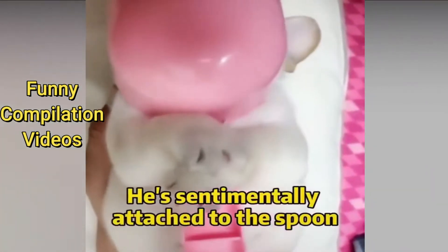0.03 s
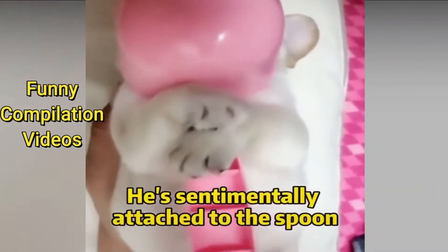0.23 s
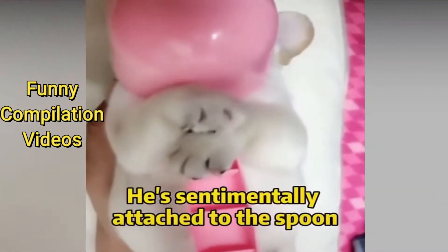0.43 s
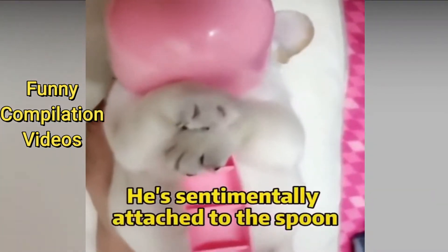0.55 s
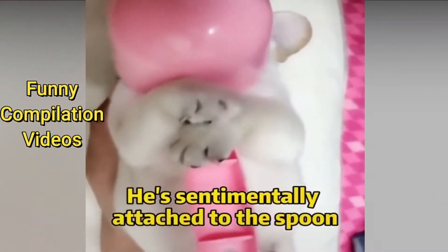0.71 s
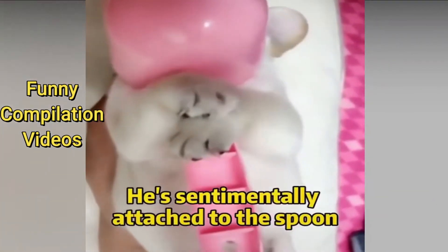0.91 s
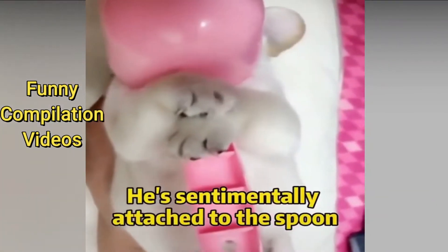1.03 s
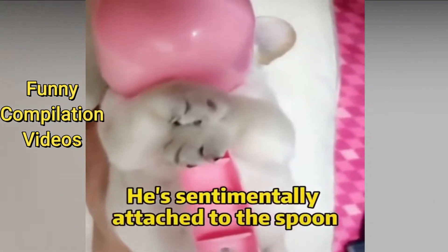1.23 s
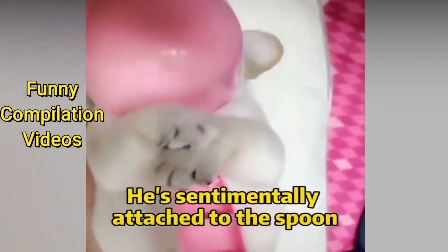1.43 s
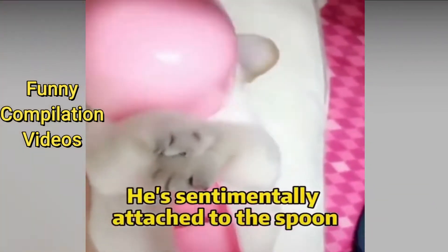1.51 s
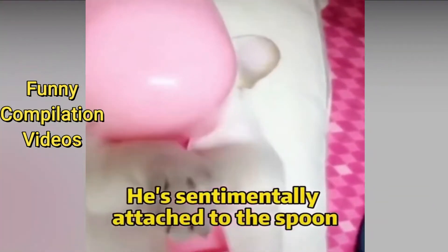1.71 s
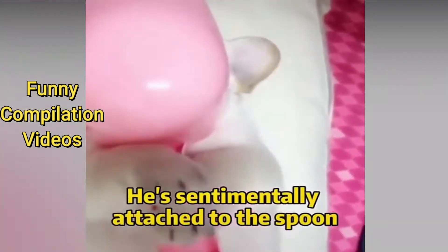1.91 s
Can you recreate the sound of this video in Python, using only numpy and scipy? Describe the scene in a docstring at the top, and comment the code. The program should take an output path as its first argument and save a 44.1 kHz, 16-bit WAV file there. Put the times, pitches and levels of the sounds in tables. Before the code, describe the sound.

A small puppy very close to a phone microphone gives two quick clear yips, then a long, rough, high-set growl, ending in a small puff of breath and a faint squeak over soft room murmur.

```python
"""In a soft, humming room a small puppy close to a phone gives two short clear yips, then a long rough growl.
Source-filter principle: fold closures are impulses, and mouth or throat is a resonant filter.
The yips pulse almost evenly; the growl's folds slap unevenly, and each slap rings the throat with a puff of air.
A puff of breath and a faint squeak follow; a short room tail, a murmur and a wavering low hum lie behind."""
import sys
import numpy as np
from scipy import signal
from scipy.fft import rfft, irfft, next_fast_len
from scipy.io import wavfile
from scipy.ndimage import uniform_filter1d, map_coordinates

SR = 44100
rng = np.random.default_rng(int(sys.argv[2]) if len(sys.argv) > 2 else 0)


def master_out(mix):
    """Clip the mix to full scale and print it as 16-bit PCM to the path in sys.argv[1]."""
    frames = np.transpose(np.atleast_2d(mix))
    ceiling = np.clip(frames, -1, 1)
    pcm = np.round(ceiling * 32767).astype(np.int16)
    wavfile.write(sys.argv[1], SR, pcm)


N = 85995

# Growl strength: (time [s], chest band level [dB], mouth band level over the chest band [dB])
GROWL_LEVELS = [(0.387, -32.5, 0.5), (0.405, -29.5, -2.5), (0.429, -39, -3), (0.459, -30.5, -4),
                (0.523, -31, 0.5), (0.563, -29, -3.5), (0.571, -33, -0.5), (0.625, -35, 3),
                (0.683, -31.5, -0.5), (0.717, -27.5, -1), (0.763, -30, 0), (1.031, -28, 1),
                (1.471, -30.5, -1.5), (1.525, -28.5, -1), (1.629, -33, -2), (1.637, -28.5, 0),
                (1.681, -46.5, -6.5), (1.69, -59, 1)]
# Growl brilliance over the chest band: (time [s], treble level [dB], top hiss level [dB])
GROWL_BRIGHTNESS = [(.38, -25.5, -38), (.43, -14, -35), (.47, -20, -40), (.65, -15, -36.5),
                    (1.2, -15.5, -33), (1.4, -18.5, -31.5), (1.62, -14.5, -32), (1.655, -16.5, -32),
                    (1.69, -24.5, -35)]
# Fold motion in the growl: (time [s], preferred rate [Hz], share of cycles that stumble [0-1])
FOLD_RATE = [(.38, 230, .6), (.46, 295, .45), (.6, 285, .5), (.8, 277, .5), (1.05, 269, .5),
             (1.15, 260, .5), (1.35, 254, .55), (1.5, 250, .7), (1.69, 245, .85)]
# Throat resonances: (frequency [Hz], gain [dB])
THROAT = [(59, -64), (100, -23.5), (219, -7.5), (240, -8), (344, -14), (463, -13), (509, -4), (567, -2.5),
          (633, 2.5), (706, -1.5), (788, 3), (893, -1.5), (1060, 3), (1500, -12), (1750, -16),
          (1920, -13.5), (2210, -1), (2550, -9.5), (2800, -1.5), (2980, -11.5), (3220, -28.5),
          (3590, -23.5), (4200, -38.5), (5460, -86), (9240, -120)]
# Resonances of the growl's treble: (frequency [Hz], gain [dB])
TREBLE = [(2470, -27), (4200, -16), (4580, -4.5), (5050, -14.5), (5250, -2), (5570, 1), (5850, -2),
          (6350, -10), (7390, -3.5), (7630, 3), (7930, -14), (8150, -8.5), (9030, -31), (11700, -24),
          (13400, -31), (14100, -28.5), (15400, -48)]
# Course of each yip: (time [s], pitch [Hz], level [dB], weakening of every other pulse [dB],
# share of the second shape [0-1])
FIRST_YIP = [(.2245, 330, -55, 4, 0), (.227, 329, -24, 0, 0), (.231, 331, -24, 5, 0.02),
             (.238, 404.4, -23.5, 4, 0.02), (.252, 394.5, -22.5, -3, 0.01), (.261, 401, -26, 2, 0.43),
             (.268, 427, -31.5, 9, 0.65), (.277, 459, -31.5, 4, 1), (.283, 440, -70, 6, 0.9)]
SECOND_YIP = [(.337, 424, -52, 0, 0.32), (.34, 435, -26, 6, 0.46), (.345, 447, -25, -2, 0.69),
              (.351, 468, -26, -2, 0), (.374, 468.6, -28, 5, 0), (.381, 522, -37.5, -7, 0.13),
              (.389, 562, -29, 2, 1), (.398, 585, -53, 13, 1)]
# Mouth resonances of the first yip, first and second shape: (frequency [Hz], gain [dB])
FIRST_MOUTH = [(180, -40), (400, -11.5), (600, -10), (790, -2), (1000, 5.5), (1200, -5.5), (1650, -15.5),
               (2050, -12.5), (2600, -25.5), (3200, -41), (5000, -53), (6300, -50), (9000, -56),
               (15000, -80)]
FIRST_MOUTH_END = [(210, -28), (450, 2), (900, -1), (1520, -6), (2100, 6.5), (2860, -18), (3600, -20),
                   (4800, -46), (6300, -15), (7440, -37), (9000, -32), (13000, -42), (16000, -64)]
# Mouth resonances of the second yip in its body; its attack mixes in the throat and its end is
# all throat: (frequency [Hz], gain [dB])
SECOND_MOUTH = [(210, -31), (350, -7), (484, -2), (659, -15), (911, -0.5), (1450, -9.5), (2810, 2),
                (3230, -46), (4010, -26.5), (4750, -22.5), (5550, -25), (6880, -21.5), (10300, -43.5),
                (13000, -37), (14000, -68)]
# Airy puff after the growl: (start [s], rise constant [s], fade constant [s], level before the envelope [dB])
BREATH = (1.686, .01, .035, -57)
# Colour of that puff: (frequency [Hz], gain [dB])
BREATH_TONE = [(1800, -60), (3200, -12), (4700, 0), (5800, -1), (9000, -9), (15400, -15)]
# Faint squeak: (start [s], end [s], mean frequency [Hz], peak level [dB])
SQUEAK = (1.795, 1.832, 2300, -56)
# Colour of the room's murmur: (frequency [Hz], gain [dB])
ROOM_TONE = [(41, -13), (70, -9), (158, -9), (193, -5), (277, -5.5), (398, -0.5), (435, 4), (558, -10),
             (639, -9.5), (917, -9.5), (1440, -15), (6240, -35), (6830, -34), (9150, -36.5), (15400, -46)]
# Mean course of the murmur: (time [s], level [dB])
ROOM_LEVEL = [(0, -49), (.08, -47.5), (.15, -50.5), (.3, -47.5), (1.0, -46.5), (1.72, -43.5), (1.85, -48),
              (1.95, -49)]

# Growl folds: cycle-length jitter and rate drift (fractions), pulse-size scatter and level unevenness [dB]
GROWL_JITTER, GROWL_SCATTER_DB, WANDER, LUMP_DB = .04, 1.6, .012, .6
STUMBLE_CYCLES = .75  # greatest extra length of a stumbling cycle
# Air relative to the slaps, before filtering: chest, mouth and treble bands
AIR_DB, MOUTH_AIR_DB, TREBLE_AIR_DB = -10, -6, 9
AIR_DECAY_S, STEADY_AIR = .002, .4  # puff decay constant; steady flow against bursts of rms 1
AIR_LEAD_S, CHEST_LAG_S = .0016, .0003  # upper-band air leads the slap; the chest band speaks late
SPLIT_HZ, HISS_HZ = 1650, 9000  # chest/mouth boundary; start of the top hiss
YIP_JITTER, YIP_SCATTER_DB, YIP_AIR_DB = .006, .8, -17
ROOM_DB, ROOM_T60_S = -20, .1
HUM_HZ, HUM_DB = 53.2, -59  # centres about which the hum wavers
TOP_HZ = 15500


def growl():
    """Irregular excitation of resonators: slaps and puffs ring the throat, with more air than slap in the treble."""
    level_db, mouth_db, span = curves(GROWL_LEVELS)
    treble_db, hiss_db, _ = curves(GROWL_BRIGHTNESS)
    rate, stumble, _ = curves(FOLD_RATE)
    wandering_rate = rate * (1 + WANDER * wobble(25))
    slaps = unit(pulses(wandering_rate, GROWL_JITTER, GROWL_SCATTER_DB, stumble=stumble))
    late_slaps = np.roll(slaps, round(CHEST_LAG_S * SR))
    parting = np.roll(slaps, -round(AIR_LEAD_S * SR))  # the folds part ahead of the slap
    drive = gated(level_db + LUMP_DB * wobble(44.8), span)

    chest = below(coloured(late_slaps + amp(AIR_DB) * puffs(slaps), THROAT), SPLIT_HZ)
    voiced = coloured(slaps + amp(MOUTH_AIR_DB) * puffs(parting), THROAT)
    mouth = voiced - below(voiced, SPLIT_HZ)
    bright = coloured(slaps + amp(TREBLE_AIR_DB) * puffs(parting), TREBLE)
    treble = below(bright, HISS_HZ)
    hiss = bright - treble

    bands = unit(chest, span) + amp(mouth_db) * unit(mouth, span)
    bands += amp(treble_db) * unit(treble, span) + amp(hiss_db) * unit(hiss, span)
    return drive * bands


def pulses(rate, jitter, scatter_db, alternate_db=0, stumble=0):
    """Perturbed periodic excitation: one impulse a cycle, uneven in length and size; stumbling cycles run long."""
    count = N // 40
    draw, luck = rng.standard_normal((count, 2)), rng.random((count, 2))
    cycles, order = np.cumsum(rate) / SR, np.arange(count)
    # 1.18 approximates the mean cycle length, stumbles included
    chance = np.interp(order * 1.18, cycles, stumble + np.zeros(N))
    extra = (luck[:, 0] < chance) * STUMBLE_CYCLES * luck[:, 1]
    due = np.cumsum(1 + jitter * draw[:, 0] + extra)
    at = np.interp(due, cycles, np.arange(N), right=N + 20)
    weak_db = np.interp(at, np.arange(N), alternate_db + np.zeros(N)) * (order % 2)
    size = amp(scatter_db * draw[:, 1] - weak_db)
    # A windowed sinc places each impulse between samples
    k = np.floor(at).astype(int)[:, None] + np.arange(-7, 9)
    offset = k - at[:, None]
    kernel = np.sinc(offset) * np.cos(np.pi * offset / 16) ** 2
    return np.bincount(k.ravel() + 8, (kernel * size[:, None]).ravel(), N + 64)[8:N + 8]


def puffs(slaps):
    """Turbulence modulated by the folds: noise bursts at each slap and decays, over a steady stream."""
    decay = np.exp(-np.arange(SR // 50) / SR / AIR_DECAY_S)
    bursts = unit(np.abs(signal.fftconvolve(slaps, decay)[:N]))
    return unit((STEADY_AIR + bursts) * rng.standard_normal(N))


def yip(course, shape_a, shape_b):
    """Near-periodic excitation: pulses with a little air pass a filter moving between two resonant shapes."""
    pitch, level_db, alternate_db, second_share, span = curves(course)
    air = amp(YIP_AIR_DB) * rng.standard_normal(N)
    folds = unit(pulses(pitch, YIP_JITTER, YIP_SCATTER_DB, alternate_db)) + air
    second_share = np.clip(second_share, 0, 1)
    drive = gated(level_db, span)

    def through(share, shape):
        """Linear filtering: the share that one shape takes, divided by that shape's own gain over the yip."""
        return coloured(share * drive * folds, shape) / np.std(coloured(folds, shape)[span])

    return through(1 - second_share, shape_a) + through(second_share, shape_b)


def breath():
    """Turbulent flow: coloured noise with an exponential rise and a Gaussian fade."""
    start, rise, fade, db = BREATH
    t = np.maximum(np.arange(N) / SR - start, 0)
    envelope = (1 - np.exp(-t / rise)) * np.exp(-(t / fade) ** 2 / 2)
    return amp(db) * envelope * unit(coloured(rng.standard_normal(N), BREATH_TONE))


def squeak():
    """Frequency modulation: a sine of slightly unsteady pitch under a half-sine envelope."""
    start, end, hz, db = SQUEAK
    phase = 2 * np.pi * np.cumsum(hz * (1 + 0.0087 * wobble(60))) / SR
    progress = np.clip((np.arange(N) / SR - start) / (end - start), 0, 1)
    return amp(db) * np.sin(np.pi * progress) * np.sin(phase)


def room(x):
    """Reverberation: convolution with exponentially decaying noise, silent for the first 3 ms."""
    t = np.arange(SR // 3) / SR
    tail = rng.standard_normal(len(t)) * amp(-60 * t / ROOM_T60_S) * (t > .003)
    return signal.fftconvolve(x, tail / np.linalg.norm(tail))[:N]


def room_tone():
    """Ambient noise: coloured noise of drifting level over a sine hum that wavers in pitch and level."""
    level_db, _ = curves(ROOM_LEVEL)
    hum_rate = HUM_HZ * (1 + 0.1196 * wobble(9.1))
    hum = amp(HUM_DB + 5.0 * wobble(13)) * np.sin(2 * np.pi * np.cumsum(hum_rate) / SR)
    murmur = unit(coloured(rng.standard_normal(N), ROOM_TONE))
    return hum + amp(level_db + 0.4 * wobble(16)) * murmur


def amp(db):
    """Logarithmic level: dB to amplitude gain."""
    return 10 ** (np.asarray(db) / 20)


def unit(x, where=slice(None)):
    """Normalisation: scale to rms 1 over a stretch."""
    return x / np.sqrt(np.mean(x[where] ** 2) + 1e-20)


def curves(rows):
    """Linear interpolation: one value per sample for each column after the time, and the samples spanned."""
    s, *cols = np.transpose(rows)
    values = [np.interp(np.arange(N) / SR, s, c) for c in cols]
    return values + [slice(int(s[0] * SR), int(s[-1] * SR))]


def gated(level_db, span):
    """Gating: a gain that fades smoothly to zero within a few ms outside the span."""
    gate = np.zeros(N)
    gate[span] = 1
    soft = uniform_filter1d(uniform_filter1d(gate, size=130), size=130)
    return np.abs(soft) * amp(level_db)


def wobble(rate):
    """Slow random modulation: a smooth random curve with the given number of knots a second."""
    knots = rng.standard_normal(int(N * rate / SR) + 4)
    return map_coordinates(knots, [np.arange(N) * rate / SR])


def coloured(x, points):
    """Causal minimum-phase filtering: the cepstrum turns (frequency [Hz], gain [dB]) points into a response."""
    size = 8192
    f, db = np.transpose(points)
    log_f = np.log(np.fft.rfftfreq(size, 1 / SR) + 1)
    gain = np.maximum(amp(np.interp(log_f, np.log(f + 1), db)), 1e-4)
    cepstrum = irfft(np.log(gain))
    cepstrum[1:size // 2] *= 2  # fold the backward half onto the forward half
    cepstrum[size // 2 + 1:] = 0
    response = irfft(np.exp(rfft(cepstrum)))
    return signal.fftconvolve(x, response)[:N]


def below(x, hz):
    """Ideal low-pass filtering: the part of x under a frequency."""
    m = next_fast_len(N + SR // 4)
    passed = np.fft.rfftfreq(m, 1 / SR) < hz
    return irfft(rfft(x, m) * passed, m)[..., :N]


def scene():
    """Superposition: the puppy, the room's answer to it and the room tone add."""
    yips = yip(FIRST_YIP, FIRST_MOUTH, FIRST_MOUTH_END) + yip(SECOND_YIP, SECOND_MOUTH, THROAT)
    puppy = growl() + yips + breath() + squeak()
    return (puppy + amp(ROOM_DB) * room(puppy) + room_tone())[None]


def record(dry):
    """Band limitation: the phone keeps nothing above its upper limit."""
    return below(dry, TOP_HZ)


dry = scene()
out = record(dry)
master_out(out)
```